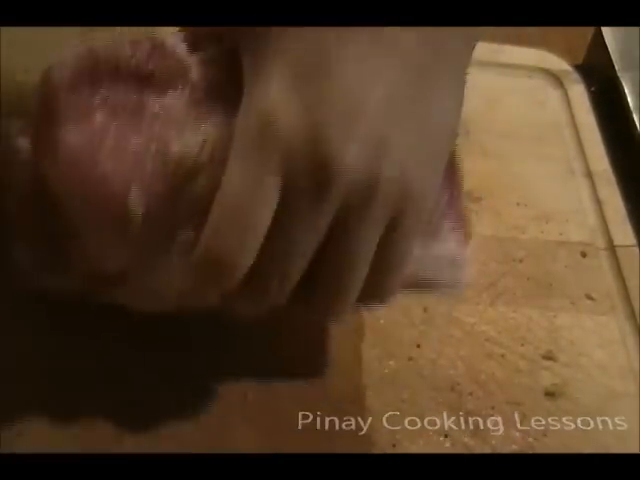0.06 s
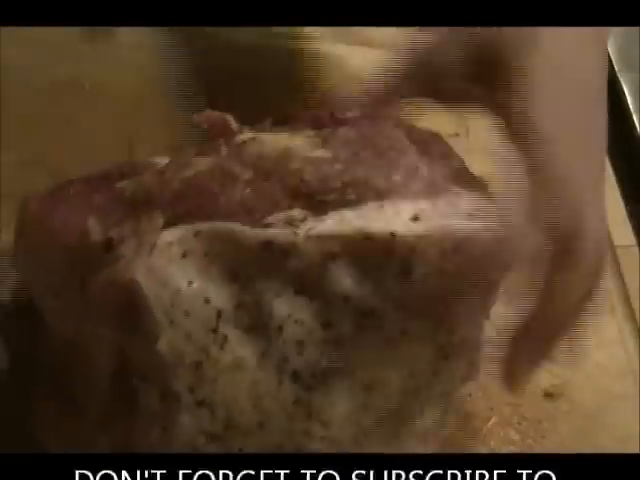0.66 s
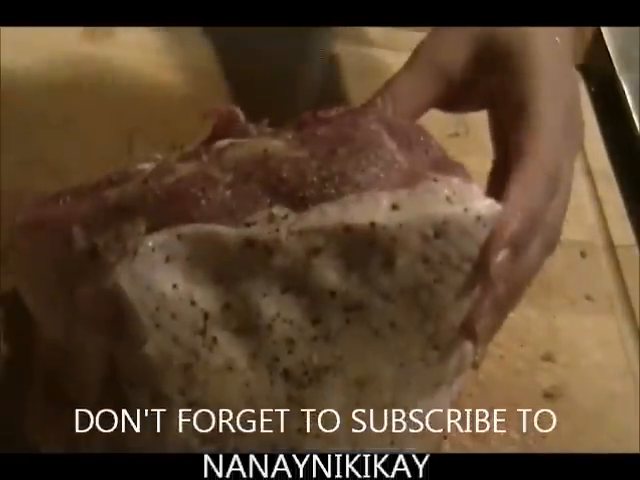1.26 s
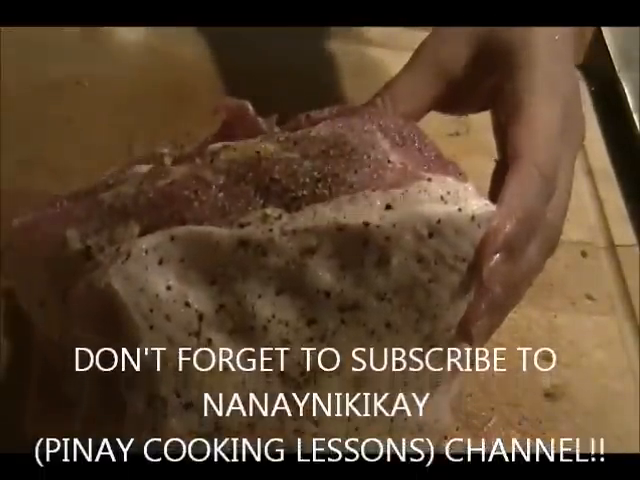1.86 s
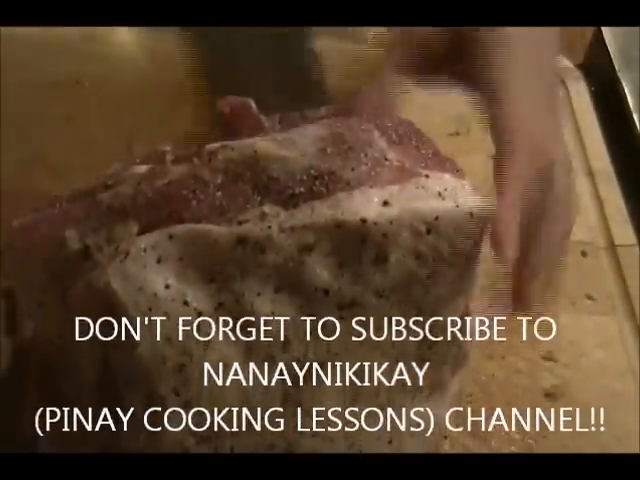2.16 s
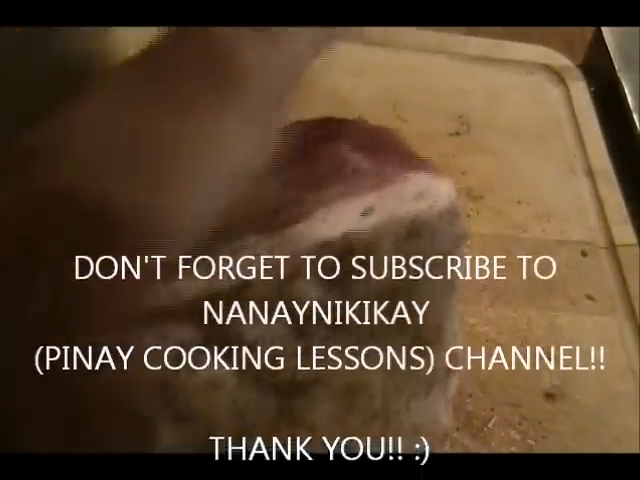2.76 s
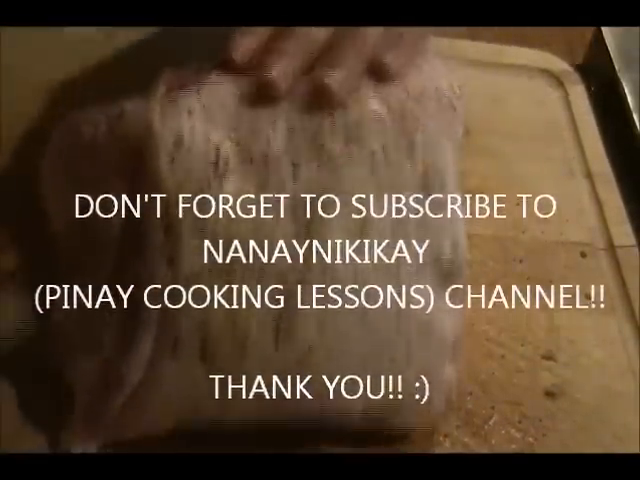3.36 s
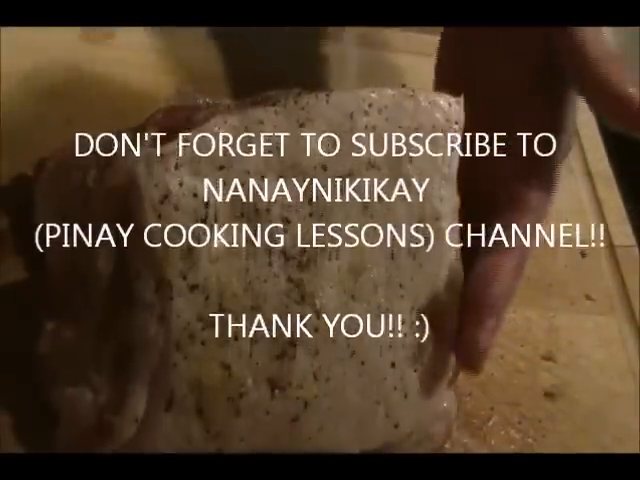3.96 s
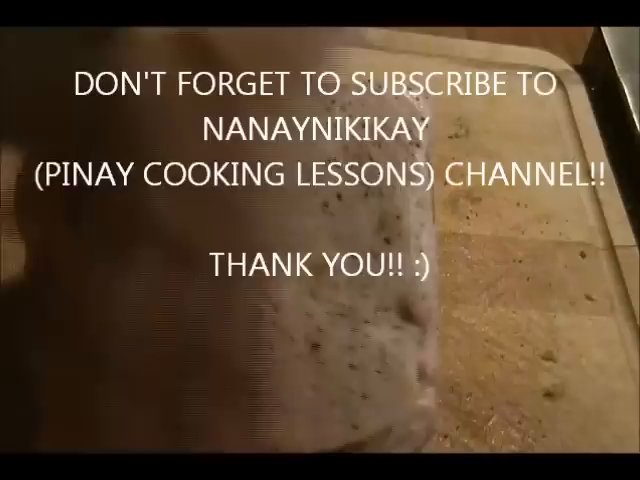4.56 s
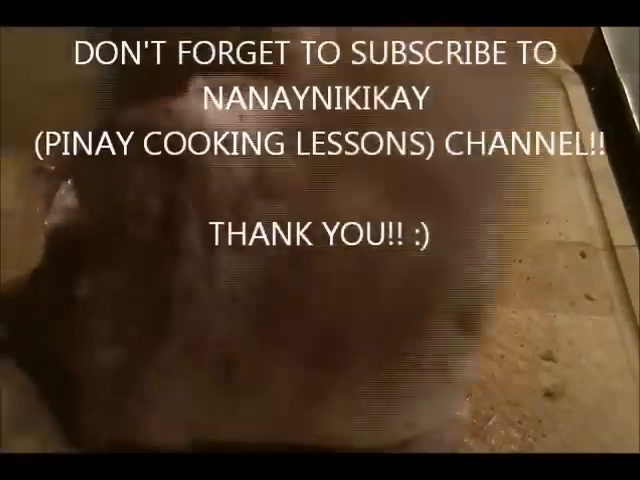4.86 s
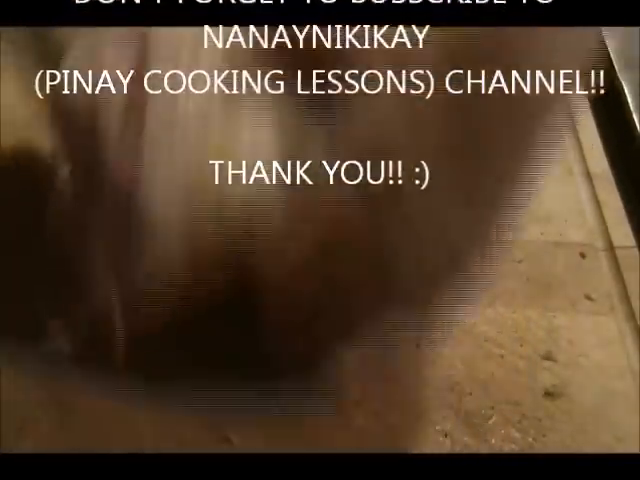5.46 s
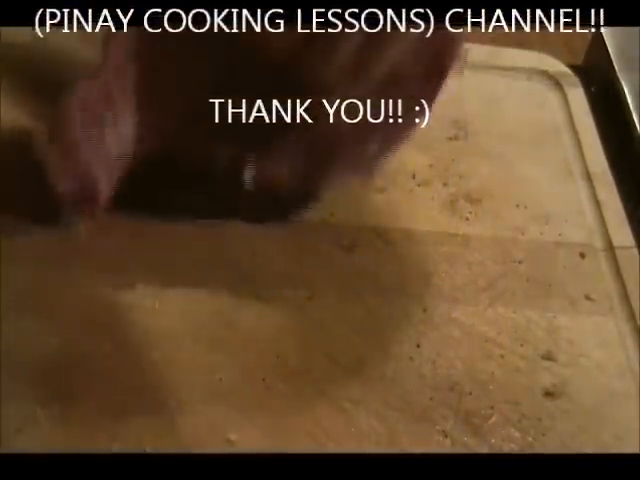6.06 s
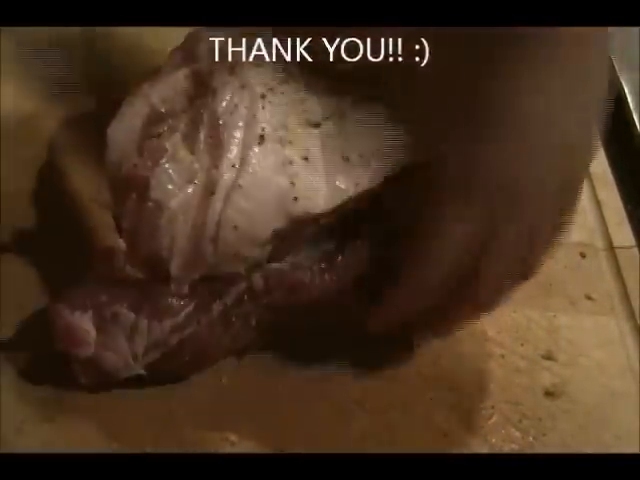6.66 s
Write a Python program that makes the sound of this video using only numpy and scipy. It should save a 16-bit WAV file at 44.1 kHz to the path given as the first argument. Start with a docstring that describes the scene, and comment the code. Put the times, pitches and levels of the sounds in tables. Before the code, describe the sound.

A low fan rumble and a gently throbbing motor hum fill a small kitchen throughout. At the start, hands rub raw meat close by with damp swishes, a squelch and small wet smacks. At about 0.5 seconds the slab lands with a dull thud and the wooden board knocks on the counter. The hands go mostly quiet until 2.4 seconds, while a tiny motor twitters faintly, returning in short runs later. From 2.4 to 3.4 seconds come more rubbing strokes, squelches and sticky smacks. Handling picks up again around 4.4 seconds, with a quick cluster of wooden knocks just after 5 seconds, followed by lighter knocks, wet pops and a soft thud. At about 6.3 seconds the meat drops and the board strikes the counter with a sharp double knock, by far the loudest sound, ringing briefly in the room.

```python
"""Small wet smacks and the swish of palms open the scene: raw, seasoned meat is rubbed and turned over
on a wooden board in a small kitchen. Friction on the damp surface hisses and crackles, and wet skin
tears loose and rings tiny pockets of air. The slab lands with damped thuds and the board knocks on the
counter, hardest near the end. Behind it all, motors hum, throb and twitter over the rumble of a fan."""
import sys
import numpy as np
from scipy import signal
from scipy.fft import rfft, irfft, next_fast_len
from scipy.io import wavfile

SR = 44100
rng = np.random.default_rng(int(sys.argv[2]) if len(sys.argv) > 2 else 0)


def put_to_file(sound):
    """Save the sound as 16-bit audio at rate SR, in the file named by the first command-line argument."""
    columns = np.atleast_2d(sound).T  # one column per channel
    safe = np.clip(columns, -1, 1)
    whole_steps = np.round(safe * 32767)
    wavfile.write(sys.argv[1], SR, whole_steps.astype(np.int16))


N = 295911
TIME = np.arange(N) / SR

# spectrum of the fan noise: (frequency [Hz], relative density [dB])
FAN_SPECTRUM = [(22, -19), (40, 0.5), (60, 2), (85, 5.5), (150, 5.5), (200, -0.5), (300, -6), (550, -10.5),
                (800, -14), (2000, -20), (3500, -20), (7000, -23), (10500, -25), (12000, -35.5)]
# left-right coherence of the fan noise: (frequency [Hz], coherence [0-1])
FAN_COHERENCE = [(100, 0.94), (400, 0.79), (1000, 0.43), (2000, 0.1), (3000, 0.5), (4200, 0.24),
                 (11000, 0.24)]
# tones of the kitchen motors: (frequency [Hz], level [dB], waver depth [0-1])
MOTOR_TONES = [(61.5, -60.5, 0.7), (190.8, -56.5, 0.42), (242.2, -58.5, 0.33), (365.7, -65.5, 0.08),
               (581.7, -61, 0.7)]
# runs of a tiny motor: (start [s], end [s], pitch [Hz], burst rate [1/s], level [dB])
TWITTER_RUNS = [(0.70, 2.28, 3850, 9.9, -56), (2.34, 2.85, 3300, 13, -52), (3.3, 3.7, 3320, 14, -54),
                (4.02, 4.45, 3300, 14, -52), (6.55, 6.7, 3320, 14, -53)]
# reverberation of the kitchen: (frequency [Hz], t60 [s], relative level [dB])
ROOM_DECAY = [(101, 0.29, 13.5), (310, 0.49, -3), (850, 0.3, -2.5), (2000, 0.41, -3), (3850, 0.47, -4.5),
              (11000, 0.99, -10)]
# the meat coming down: (time [s], level [dB], pitch [Hz])
LANDINGS = [(0.49, -23, 172), (0.514, -25.5, 85.4), (0.525, -22.5, 152), (0.544, -31, 94),
            (5.619, -29, 188), (6.3312, -11, 198), (6.3592, -16.5, 165)]
# damped modes of the slab: (multiple of the landing's pitch [ratio], bandwidth [Hz], gain [dB])
SLAB_MODES = [(1, 44, -1.5), (2.2, 198, -0.5)]
# the board striking the counter:
# (time [s], level [dB], brightness [Hz], wetness [0-1], clack pitch by place of contact [ratio])
BOARD_KNOCKS = [(0.4824, -17, 2650, 0.65, 0.87), (0.5246, -14.5, 5470, 0.63, 1.13),
                (5.0486, -18.5, 3400, 0.36, 0.71), (5.0543, -18.5, 4160, 0.5, 1),
                (5.0878, -17.5, 3400, 0.5, 0.78), (5.099, -22, 1500, 0.55, 0.55),
                (5.11, -16.5, 3500, 0.6, 0.676), (5.125, -24, 3550, 0.36, 1.09),
                (5.4014, -24, 3000, 0.56, 0.84), (5.444, -24.5, 2600, 0.24, 1.06),
                (5.8905, -27.5, 4140, 1, 0.6), (6.3272, -1.5, 3220, 0.13, 0.973),
                (6.3405, -1, 1970, 0.1, 0.96), (6.37, -12.5, 1400, 0.5, 0.74)]
# broad resonances of the wood's dry clack: (frequency [Hz], bandwidth [Hz], gain [dB])
CLACK_MODES = [(490, 240, -7), (856, 300, 1.5), (1350, 103, -1), (1830, 550, 5), (2850, 640, 4),
               (5050, 1500, 3.5)]
# modes of board and counter that ring on: (frequency [Hz], gain [dB], t60 [s])
BOARD_MODES = [(208, -1, .28), (355, -7, .28), (432, -6, .3), (509, -8, .24), (603, -7, .2), (804, -5, .18),
               (937, -2, .22), (1014, -5, .2), (1211, -6, .2), (1287, -2, .22), (1418, -7, .22),
               (1507, -6, .22), (1875, -7, .2)]
# moisture squeezed from under the palm: (start [s], length [s], level [dB], pitch [Hz])
SQUEEZES = [(0.0, 0.4, -51.5, 1424), (2.575, 0.14, -51.5, 1658), (2.897, 0.062, -43, 1955),
            (3.14, 0.085, -47.5, 1150), (4.87, 0.11, -63, 2150), (5.353, 0.12, -42.5, 1490)]
# spectrum of wet friction: (frequency [Hz], relative density [dB])
SMEAR_SPECTRUM = [(300, -16), (700, -4), (1400, -4), (2100, -5.5), (3000, -4.5), (4500, -12.5), (8000, -38)]
# spectrum of dry friction: (frequency [Hz], relative density [dB])
SWISH_SPECTRUM = [(1500, -52), (3000, 3), (4500, 6.5), (6300, 4.5), (8000, 3), (11000, 5), (12500, -20)]
# strokes of the hands over the meat:
# (start [s], length [s], wet smear gain [dB], dry swish re smear [dB], fine hiss re smear [dB])
HAND_STROKES = [(-0.05, 0.19, -48, -0.5, 0.5), (0.168, 0.12, -46, -12, -3.5),
                (0.462, 0.06, -41.5, -5.5, -5), (0.934, 0.12, -60, 3, 4), (2.427, 0.17, -51.5, -2.5, -2.5),
                (2.615, 0.13, -51, 0, 0.5), (2.887, 0.07, -47, -0.5, -1.5), (3.08, 0.13, -45, 0.5, 2),
                (3.21, 0.11, -50.5, -6, -5), (4.386, 0.24, -49, -3, -6), (4.78, 0.21, -45.5, 1, -6),
                (5.081, 0.09, -42.5, -12, -23), (5.22, 0.15, -49.5, -0.5, 2), (5.397, 0.13, -42.5, -2, -1),
                (5.618, 0.17, -54, 1, 3.5), (5.886, 0.17, -48, 0, -1), (6.095, 0.2, -46.5, -1, 0),
                (6.22, 0.025, -43, 2.5, 8.5)]
# wet skin letting go: (time [s], level [dB], pitch [Hz], snap re pocket resonance [dB])
SKIN_SMACKS = [(0.0204, -23, 1390, 0.5), (0.0782, -26.5, 1460, 7), (0.1306, -29.5, 4740, -13),
               (0.2314, -22, 1220, -13), (0.2643, -27, 1280, 7), (2.5541, -25.5, 3940, 7),
               (2.8629, -22, 5200, -13), (3.0829, -22.5, 4000, -10), (3.1428, -21, 4370, -12),
               (3.2864, -30, 1900, -10), (3.3453, -31.5, 1490, -15), (3.6391, -34.5, 1660, 10),
               (4.4089, -31, 1890, 13), (4.5101, -30.5, 3050, -15), (5.2545, -23, 2360, 21),
               (5.5218, -22, 2480, 9), (5.5354, -28.5, 1410, -8), (5.7159, -28.5, 3480, 18),
               (5.7528, -25.5, 5750, -1), (6.0387, -23, 2090, 4), (6.1285, -24.5, 1650, -4),
               (6.2412, -18, 4930, 0), (6.2514, -20.5, 2450, -9)]


def from_db(db):
    """Amplitude grows tenfold for every 20 dB."""
    return 10 ** (np.asarray(db) / 20)


def rms_one(x):
    """Normalisation to unit mean power."""
    return x / np.sqrt(np.mean(x ** 2) + 1e-20)


def at_hz(table, hz, column=1):
    """Interpolation of a table's column on a log-frequency axis."""
    table = np.array(table)
    return np.interp(np.log(np.maximum(hz, 1)), np.log(table[:, 0]), table[:, column])


def coloured(x, spectrum):
    """Spectral shaping of a steady sound, returned at rms 1."""
    size = next_fast_len(N)
    gain = from_db(at_hz(spectrum, np.fft.rfftfreq(size, 1 / SR)))
    return rms_one(irfft(rfft(x, size) * gain, size)[..., :N])


def butter(x, hz, kind="low", order=2):
    """Causal low- or high-pass filtering with a maximally flat passband."""
    return signal.sosfilt(signal.butter(order, min(hz, .45 * SR), kind, fs=SR, output="sos"), x + 1e-18)


def drift(per_s):
    """Random modulation: straight lines join chance values; rms 1."""
    return rms_one(np.interp(TIME * per_s, np.arange(4000), rng.standard_normal(4000)))


def grains(per_s, spread_db):
    """Shot noise: independent clicks of uneven size; rms 1."""
    sizes = from_db(spread_db * np.minimum(rng.exponential(1, N), 4)) * rng.choice([-1, 1], N)
    return rms_one(sizes * (rng.random(N) < per_s / SR))


def ring(x, hz, width_hz):
    """A damped oscillator answers each impulse with a decaying sine."""
    radius, angle = np.exp(-np.pi * width_hz / SR), 2 * np.pi * hz / SR
    return signal.lfilter([0, np.sin(angle)], [1, -2 * radius * np.cos(angle), radius ** 2], x + 1e-18)


def body(x, modes):
    """Modal superposition: resonances respond in parallel, with alternating signs."""
    return sum((-1) ** k * from_db(db) * ring(x, hz, width) for k, (hz, width, db) in enumerate(modes))


def add(track, s, sound):
    """Superposition of a short sound on a track, starting at s seconds."""
    start = max(round(s * SR), 0)
    track[start:start + len(sound)] += sound[:N - start]


def stereo(mid, side, coherence):
    """Partial coherence: left and right share one noise and take another with opposite signs."""
    return np.sqrt(1 + coherence) * mid + np.sqrt(1 - coherence) * side * [[1], [-1]]


def fan(level_db=-44):
    """In a diffuse field, fan noise is coherent in the bass and largely incoherent in the treble."""
    size = next_fast_len(N)
    coherence = np.clip(at_hz(FAN_COHERENCE, np.fft.rfftfreq(size, 1 / SR)), 0, 1)
    mid, side = rfft(rng.standard_normal((2, size)))
    noise = irfft(stereo(mid, side, coherence), size)
    return from_db(level_db) * coloured(noise, FAN_SPECTRUM)


def motors(mains_hum_hz=120.02, level_db=-40, sag_db=-8, waver_db=0.9):
    """Amplitude modulation: the hum sags regularly, as when two motors beat; weaker tones waver."""
    first_sag_s, period_s, half_width_s, edge_s = 1.056, 1.182, 0.18, 0.046
    from_sag_s = np.abs((TIME - first_sag_s + period_s / 2) % period_s - period_s / 2)
    sag = .5 - .5 * np.tanh((from_sag_s - half_width_s) / (2 * edge_s))
    sag *= TIME > first_sag_s - period_s / 2
    hum_db = level_db + sag_db * sag + waver_db * drift(per_s=7)
    hum = from_db(hum_db) * np.exp(2j * np.pi * mains_hum_hz * TIME + .2j * drift(per_s=2.6))
    for hz, db, depth in MOTOR_TONES:
        waver = 1 + depth * (drift(per_s=8) + 1j * drift(per_s=8))
        hum += from_db(db) * waver * np.exp(2j * np.pi * hz * TIME)
    return np.sqrt(2) * hum.real


def twitter(glide_hz=95):
    """Frequency modulation: a tiny motor steps in uneven bursts, each a thin, rising chirp."""
    out = np.zeros(N)
    stumble = 0.5 * drift(per_s=10)
    scatter_hz, uneven_db = 115 * drift(per_s=440), 1.4 * drift(per_s=12)
    for start, end, hz, per_s, db in TWITTER_RUNS:
        cycle = 2 * np.pi * per_s * (TIME - start) + stumble
        bursts = np.maximum(np.sin(cycle), 0) ** 2 * (TIME > start) * (TIME < end)
        pitch = hz + scatter_hz - glide_hz * np.cos(cycle)
        out += from_db(db + uneven_db) * bursts * np.sin(2 * np.pi * np.cumsum(pitch) / SR)
    return out


def kitchen(x, size=22050, first_echo_s=.003):
    """Reverberation: dense reflections from near walls decay exponentially, band by band."""
    t, response = np.arange(size) / SR, 0
    edges = np.geomspace(60, 13000, 11)
    for low, high in zip(edges, edges[1:]):
        hz = np.sqrt(low * high)
        band = signal.butter(2, [low, high], "band", fs=SR, output="sos")
        mid, side = signal.sosfilt(band, rng.standard_normal((2, size)))
        coherence = 1 / (1 + (hz / 2500) ** 2)   # long waves reach both sides alike
        decay_db = at_hz(ROOM_DECAY, hz, column=2) - 60 * t / at_hz(ROOM_DECAY, hz)
        response += stereo(mid, side, coherence) * from_db(decay_db)
    response *= np.clip((t - first_echo_s) / 0.00055, 0, 1)
    response /= np.sqrt(np.sum(response ** 2) / 2)
    return signal.fftconvolve(x, response, axes=1)[:, :N]


def thuds(size=6000):
    """Heavy damping: the soft slab lands and wobbles for only a few cycles."""
    out, push = np.zeros(N), butter(signal.unit_impulse(size), hz=680)
    for s, db, hz in LANDINGS:
        thud = body(push, [(hz * multiple, width, gain) for multiple, width, gain in SLAB_MODES])
        add(out, s, from_db(db) * thud / np.abs(thud).max())
    return out


def contacts(flop_s=0.00624, flop_db=-11.5, dulling=0.49, lowering=0.804):
    """Two-stage impact: after each first touch the flesh flops down, softer, duller and lower."""
    rows = []
    for s, db, bright_hz, wet, ratio in BOARD_KNOCKS:
        rows.append((s, db, bright_hz, wet, ratio))
        rows.append((s + flop_s, db + flop_db, bright_hz * dulling, wet, ratio * lowering))
    return rows


def board(size=13000, spray_decay_s=0.0045, ringing_db=-22.5):
    """Impact excitation: broad modes of the wood clack, and narrow ones ring on faintly."""
    clacks, force = np.zeros((2, N))
    t, rows = np.arange(size) / SR, contacts()
    for (s, db, bright_hz, wet, ratio), spray in zip(rows, rng.standard_normal((len(rows), size))):
        # a wet contact spreads into a short spray of tiny touches
        contact = signal.unit_impulse(size) + 0.26 * wet * spray * np.exp(-t / spray_decay_s)
        pulse = butter(contact, bright_hz, order=4)   # soft flesh rounds the blow
        clack = body(pulse, [(hz * ratio, width, gain) for hz, width, gain in CLACK_MODES])
        strength = from_db(db) / np.abs(clack).max()
        add(clacks, s, strength * clack)
        add(force, s, strength * pulse)
    ringing = sum(from_db(db) * ring(force, hz, width_hz=np.log(1000) / (np.pi * t60))
                  for hz, db, t60 in BOARD_MODES)
    return butter(clacks + from_db(ringing_db) * ringing, 170, "high")


def spatter(size=1500, gain_db=-5.0, decay_s=0.0062):
    """Squeeze flow: juice squirts from under each wet knock with a short, bright fizz."""
    out, t = np.zeros(N), np.arange(size) / SR
    sprays = rng.choice([-1, 1], (len(BOARD_KNOCKS), size))
    for (s, db, _, wet, _), spray in zip(BOARD_KNOCKS, sprays):
        add(out, s, from_db(db + gain_db) * wet * spray * np.exp(-t / decay_s))
    return butter(butter(out, 2600, "high"), 5500)


def swells(rows, attack_share=0.37, release_s=0.04):
    """Incoherent strokes add in power; each (start [s], length [s], gain [dB]) rises, holds, fades."""
    power = np.zeros(N)
    for s, length, db in rows:
        t = TIME[:int((length + 10 * release_s) * SR)] - min(s, 0)
        attack = np.minimum(t / (attack_share * length), 1)
        release = np.exp(-np.maximum(t - length, 0) / release_s)
        add(power, s, (from_db(db) * attack * release) ** 2)
    return np.sqrt(power)


def effort(rest_smear_db=-58, rest_swish_db=-66):
    """Power summation of strokes and resting hands gives the gains of smear, swish and fine hiss."""
    wet = swells([(s, length, db) for s, length, db, _, _ in HAND_STROKES])
    dry = swells([(s, length, db + dry_db) for s, length, db, dry_db, _ in HAND_STROKES])
    fine = swells([(s, length, db + fine_db) for s, length, db, _, fine_db in HAND_STROKES])
    rest_smear, rest_swish = from_db([rest_smear_db, rest_swish_db])
    return np.hypot(wet, rest_smear), np.hypot(dry, rest_swish), np.hypot(fine, rest_swish)


def squelch(width_hz=270):
    """Cavity resonance: trapped moisture crackles in two bands, pitched by the cavity's size."""
    crackle, out = grains(per_s=1300, spread_db=2.0), 0
    narrow, wide = rms_one(butter(crackle, width_hz)), rms_one(butter(crackle, 3 * width_hz))
    for s, length, db, hz in SQUEEZES:
        phase = 2 * np.pi * hz * TIME
        cavity = narrow * np.sin(phase) + from_db(-3) * wide * np.sin(2.8 * phase)
        out += swells([(s, length, db)]) * cavity
    return out


def rubbing(wet, dry, fine, split_hz=6750):
    """Stick-slip friction: sticky films tear in crackles while skin and seasoning slide and hiss."""
    grip = from_db(2.0 * drift(per_s=60))   # the palm catches and slips
    tearing = grains(per_s=900, spread_db=4.5) + 0.82 * rng.standard_normal(N)
    smear = 0.75 * grip * coloured(tearing, SMEAR_SPECTRUM)
    crackle = coloured(grains(per_s=300, spread_db=4.3), SWISH_SPECTRUM)
    hiss = coloured(rng.standard_normal((2, N)), SWISH_SPECTRUM)   # from all over the palms, so wide
    swish = grip * (crackle + 0.76 * hiss)
    palm = butter(swish, split_hz, order=3)
    seasoning = butter(swish, split_hz, "high", order=3)
    return wet * smear + dry * palm + fine * seasoning + squelch()


def faint_smacks(wet, count=24, level_db=-31.5, spread_db=6, low_hz=1370, high_hz=4350, snap_db=0.5):
    """A random point process: rows of faint smacks, likelier the harder the hands rub."""
    when, size, pitch = rng.random((count, 3)).T
    busy = wet - wet.min()
    times = np.interp(when, np.cumsum(busy) / busy.sum(), TIME)
    levels = level_db + spread_db * (2 * size - 1)
    pitches = low_hz * (high_hz / low_hz) ** pitch
    return [(s, db, hz, snap_db) for s, db, hz in zip(times, levels, pitches)]


def smacks(wet, size=1500, rise_s=0.00044, decay_s=0.0015):
    """Adhesion fails: wet skin tears free with a broad snap and rings a small pocket of air."""
    out, t = np.zeros(N), np.arange(size) / SR
    rows = list(SKIN_SMACKS) + faint_smacks(wet)
    envelope = (1 - np.exp(-t / rise_s)) * np.exp(-t / decay_s)
    for (s, db, hz, snap_db), spray in zip(rows, rng.choice([-1, 1], (len(rows), size))):
        tear = .5 * spray * envelope + 0.28 * signal.unit_impulse(size)
        pocket = butter(ring(tear, hz, width_hz=0.19 * hz), 1.16 * hz, "high")
        snap = butter(butter(tear, 1500, "high"), 4900)
        pop = rms_one(pocket) + from_db(snap_db) * rms_one(snap)
        add(out, s, from_db(db) * pop / np.abs(pop).max())
    return out


def scene(hands_room_db=-7.5, wood_room_db=-10.5, left_db=0.14, right_db=1.29):
    """Direct and reverberant sound add; time and level cues place them a little to the right."""
    wet, dry, fine = effort()
    hands = rubbing(wet, dry, fine) + smacks(wet) + spatter()
    wood = board() + thuds()
    room = kitchen(from_db(hands_room_db) * hands + from_db(wood_room_db) * wood)
    left, right = motors() + twitter() + fan() + room + wood + hands
    left = np.roll(left, 2)   # arrives two samples later
    return np.array([from_db(left_db) * left, from_db(right_db) * right])


def record(dry, ceiling=.95, cutoff_hz=11700):
    """Clipping and band limiting: peaks stop at the ceiling, then a steep low-pass cuts the top."""
    low_pass = signal.ellip(10, .1, 80, cutoff_hz, fs=SR, output="sos")
    return signal.sosfilt(low_pass, np.clip(dry, -ceiling, ceiling))


dry = scene()
out = record(dry)
put_to_file(out)
```